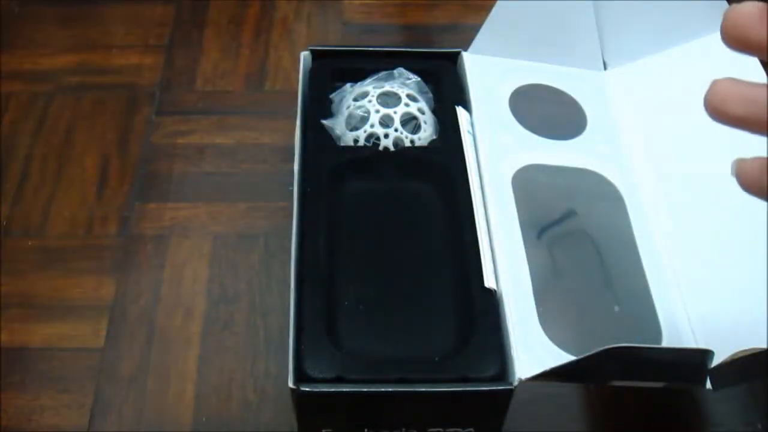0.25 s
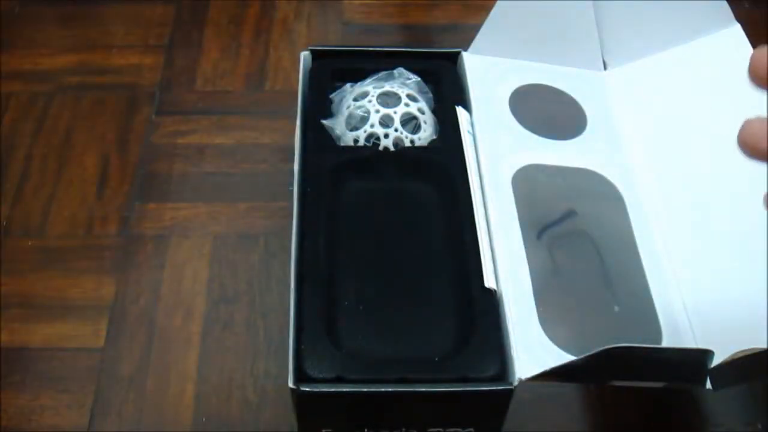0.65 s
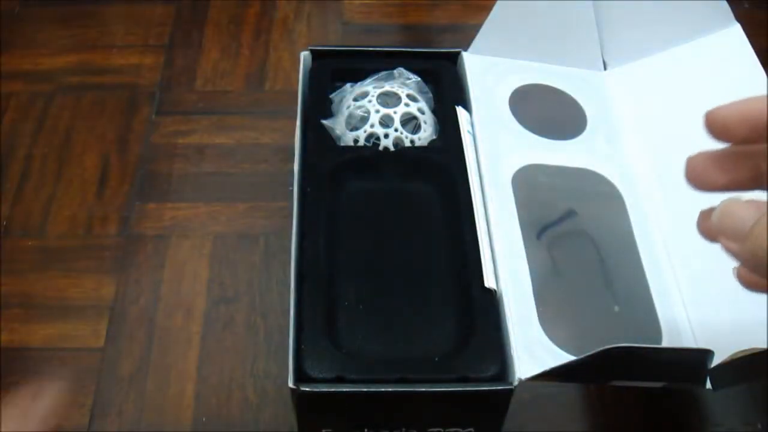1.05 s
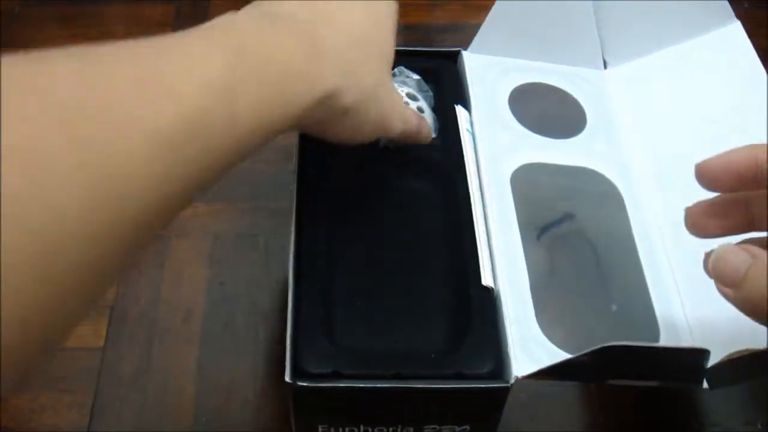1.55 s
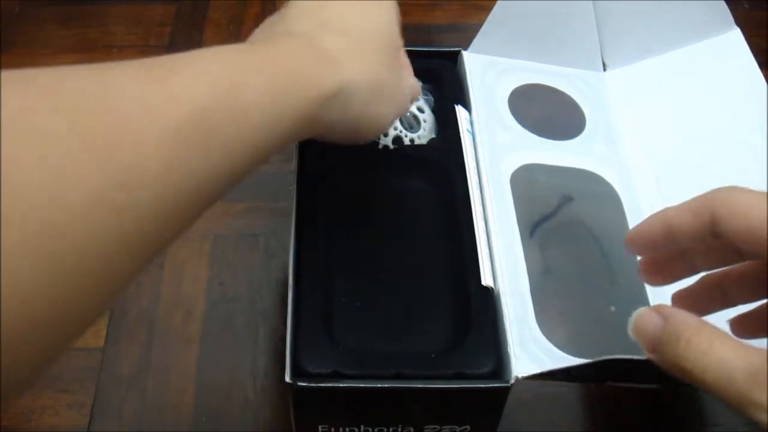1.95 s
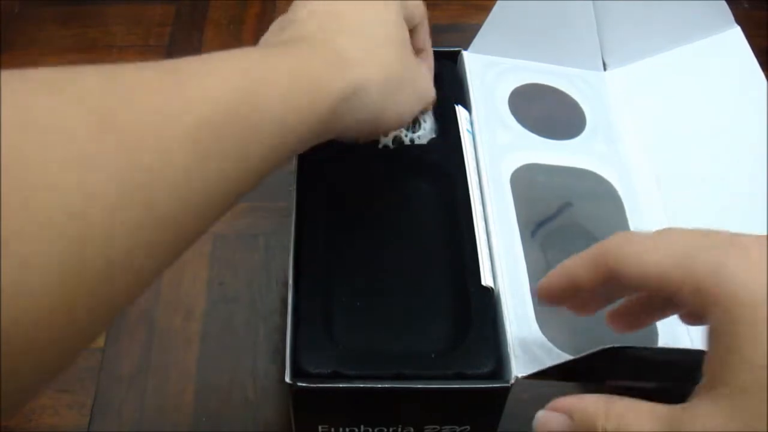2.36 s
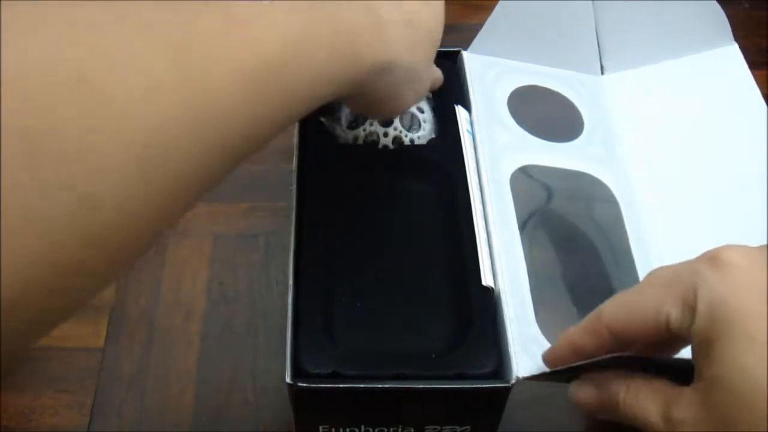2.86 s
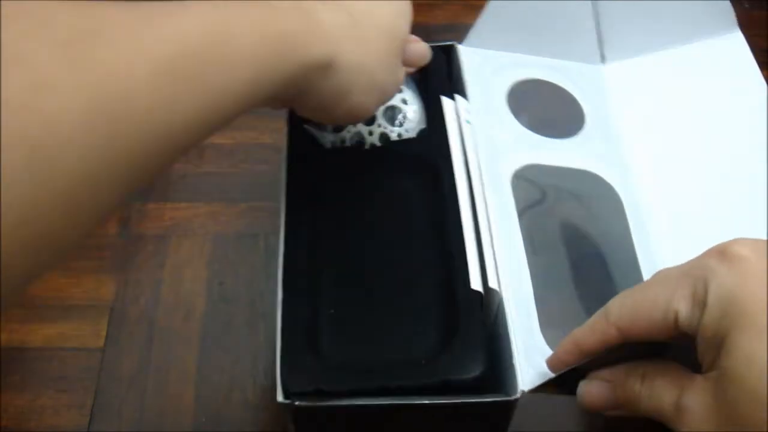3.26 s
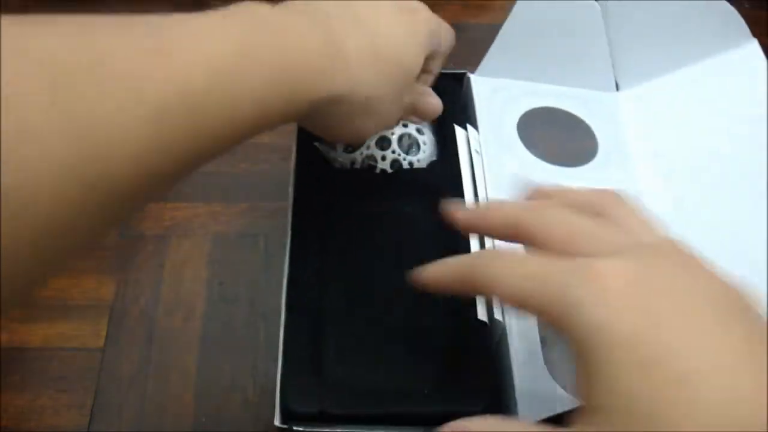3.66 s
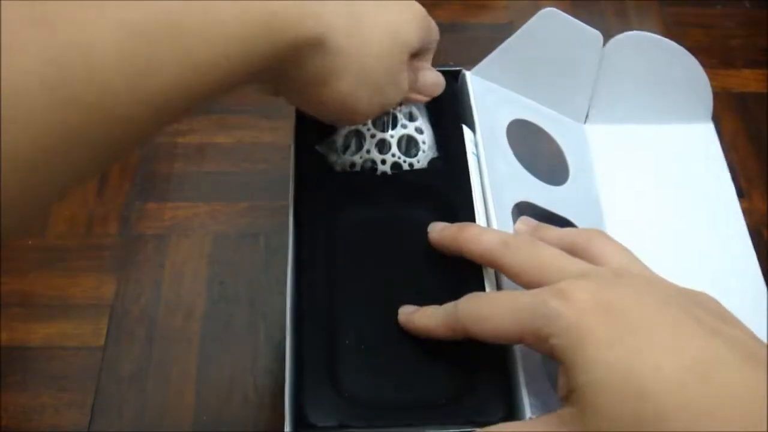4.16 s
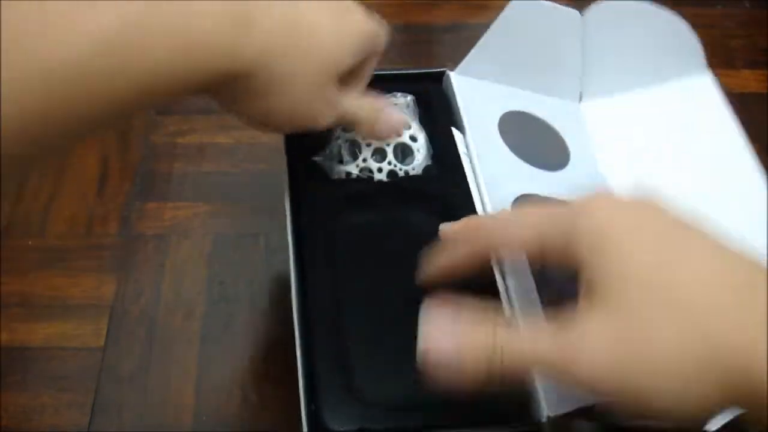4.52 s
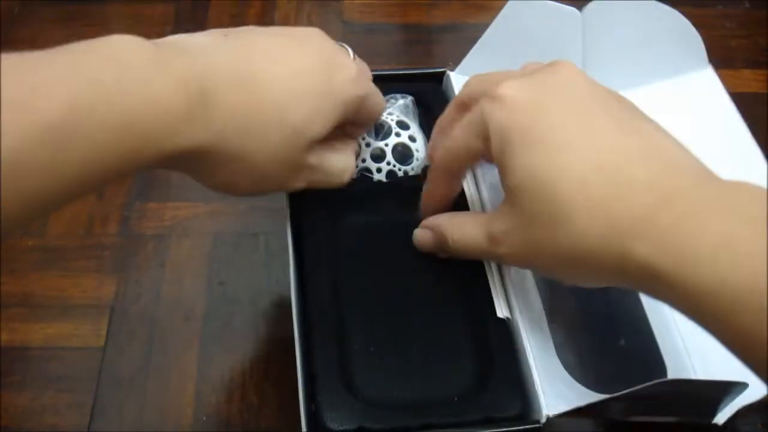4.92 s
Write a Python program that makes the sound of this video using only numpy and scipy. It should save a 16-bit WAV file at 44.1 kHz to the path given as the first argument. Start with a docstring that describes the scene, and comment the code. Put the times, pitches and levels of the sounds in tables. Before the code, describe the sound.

Short papery rubs and isolated plastic clicks come first, one of them sharp, then near silence. From about a second and a half, plastic wrapping crackles almost continuously in irregular tugs, bright and brittle, mixed with faint cardboard scraping and small hollow bumps. It thins briefly around four seconds, then grows denser and louder. Heard close on a small microphone in a small room with slight reflections and low noise.

```python
"""Fingers dig at a part wrapped in thin plastic film: sharp ringing snaps over tiny crinkles and sliding hiss.
Snaps are damped rings plus noise cracks; crinkles are random short rings; hiss and scraping are coloured grains.
Before that a hand brushes the open lid of the cardboard box; hand and part bump the box, a bank of damped modes.
A small room answers, over steady noise and hum; a small microphone with a narrow band listens from close by."""
import sys
import numpy as np
from scipy import signal
from scipy.fft import rfft, irfft, next_fast_len
from scipy.io import wavfile
from scipy.ndimage import uniform_filter1d, map_coordinates

SR = 44100
rng = np.random.default_rng(int(sys.argv[2]) if len(sys.argv) > 2 else 0)


def to_wav(s):
    """Save 16-bit WAV."""
    ch = np.atleast_2d(s).T  # columns
    pcm = np.round(np.clip(ch, -1, 1) * 32767)  # PCM
    wavfile.write(sys.argv[1], SR, pcm.astype(np.int16))


N = 228832  # length [samples]


def amp(db):
    """Decibels to gain."""
    return 10 ** (np.asarray(db) / 20)


def unit(x):
    """Scale to rms 1."""
    return x / np.sqrt(np.mean(x ** 2) + 1e-20)


def along(points, hz):
    """Interpolate (frequency [Hz], value) points on a log-frequency axis."""
    f, v = np.transpose(points)
    return np.interp(np.log(hz + 1), np.log(f), v)


def wobble(knots_per_s):
    """Smooth random curve through normally distributed knots."""
    knots = rng.standard_normal(int(N * knots_per_s / SR) + 4)
    return map_coordinates(knots, [np.arange(N) * knots_per_s / SR])


def coloured(x, spectrum, size=2048):
    """Minimum-phase filter with the given spectrum, keeping the power of white noise."""
    gain = amp(along(spectrum, np.fft.rfftfreq(size, 1 / SR)))
    cepstrum = irfft(np.log(gain))
    # fold the cepstrum to make the response causal
    cepstrum[1:size // 2] *= 2
    cepstrum[size // 2 + 1:] = 0
    response = unit(irfft(np.exp(rfft(cepstrum)))) / np.sqrt(size)
    return signal.fftconvolve(x, response)[:len(x)]


def add(track, start_s, sound):
    """Mix a sound into the track in place."""
    part = track[max(round(start_s * SR), 0):][:len(sound)]
    part += sound[:len(part)]


def ring(t, hz, t60_s):
    """Damped vibration that builds up over about its first cycle."""
    return np.sin(2 * np.pi * hz * t) * amp(-60 * t / t60_s) * (1 - np.exp(-2 * hz * t))


def levelled(x, span_s):
    """Even out the power over the span, leaving the finer grain."""
    power = np.abs(uniform_filter1d(x ** 2, int(span_s * SR)))
    return x / np.sqrt(power + 1e-3 * np.mean(x ** 2))


def strokes(rows, rise_db_per_s, fall_db_per_s):
    """Each stroke swells, holds and dies away; strokes add in power, one gain curve per level column."""
    t = np.arange(N) / SR
    power = 0
    for start_s, held_s, *levels_db in rows:
        before_s = np.maximum(start_s - t, 0)
        after_s = np.maximum(t - start_s - held_s, 0)
        shape_db = -rise_db_per_s * before_s - fall_db_per_s * after_s
        live = shape_db > -60
        shape = np.zeros(N)
        shape[live] = amp(shape_db[live])
        power = power + np.outer(amp(levels_db), shape) ** 2
    return np.sqrt(power)


def crinkles(per_s, hz, spread, cycles, size_db, count=260):
    """Tiny facets buckle at random, each with its own pitch; most are faint, a few stand out."""
    when, pitch, size_draw = rng.random((int(per_s * N / SR), 3)).T
    t = np.arange(count) / SR
    f = hz * np.exp(spread * (2 * pitch - 1))[:, None]
    # exponential spread of sizes in dB, capped
    sizes = amp(size_db * np.minimum(-np.log(1 - size_draw), 4))[:, None]
    grains = sizes * ring(t, f, cycles / f)
    at = (when * N).astype(int)[:, None] + np.arange(count)
    return unit(np.bincount(at.ravel(), grains.ravel(), N + count)[:N])


def rustle(colour, slips, per_s, hz, cycles, size_db, smooth):
    """Crinkles over a smooth rub, clumped by the slips of the fingers; rms near 1."""
    grains = crinkles(per_s, hz, spread=0.61, cycles=cycles, size_db=size_db)
    grains = grains + smooth * rng.standard_normal(N)
    return levelled(coloured(grains * slips, colour), span_s=0.0305)


# Spectrum of the steady noise: (frequency [Hz], relative density [dB])
NOISE_COLOUR = [(25, -26), (70, -11.5), (130, -5.5), (300, 2.5), (450, 1.5), (800, 2), (1200, -0.5),
                (1600, -1), (2300, -5.5), (5000, -10), (11000, -16)]


def background(noise_db, hum_db=-83, hum_hz=100):
    """Steady room noise with a faint mains hum."""
    noise = unit(coloured(rng.standard_normal(N), NOISE_COLOUR))
    hum = unit(np.sin(2 * np.pi * hum_hz * np.arange(N) / SR))
    return amp(noise_db) * noise + amp(hum_db) * hum


# Reverberation time of the room: (frequency [Hz], t60 [s])
ROOM_DECAY = [(200, 0.65), (2000, 0.29), (10000, 0.26)]


def room(x):
    """The walls' answer, a decaying noise tail; the treble dies first."""
    hz, t, z = signal.stft(rng.standard_normal(SR // 2), SR, nperseg=256)
    decay = amp(-60 * t / along(ROOM_DECAY, hz)[:, None])
    tail = signal.istft(z * decay, SR, nperseg=256)[1]
    tail = np.pad(tail, (SR // 300, 0))  # gap before the answer
    return signal.fftconvolve(x, tail / np.linalg.norm(tail))[:N]


# Brushes over the lid: (start of hold [s], hold [s], rustle level [dB], hiss level [dB])
LID_BRUSHES = [(0.262, 0.023, -38, -39), (0.44, 0.13, -45, -42), (0.677, .022, -34, -39),
               (0.865, 0.16, -52, -51), (1.008, 0.0087, -47.5, -38.5)]
# Spectra of lid rustle and hiss: (frequency [Hz], relative density [dB])
LID_RUSTLE_COLOUR = [(40, -43), (120, -29), (330, -7), (620, -5.5), (900, -4), (1300, -2.5), (1580, 0.5),
                     (1800, -1.5), (2100, 8.5), (2700, -6.5), (4000, 0), (11000, -33)]
LID_HISS_COLOUR = [(40, -51), (1000, -27), (2500, 2.5), (3500, -2.5), (4500, -1), (6300, 0), (8500, -3.5),
                   (11000, -6.5)]


def lid(clump_db=4.0):
    """Fingers slide over the lid and its plastic window in a few strokes; their slips clump rustle and hiss."""
    rustle_gain, hiss_gain = strokes(LID_BRUSHES, rise_db_per_s=472, fall_db_per_s=254)
    slips = amp(clump_db * wobble(300))
    rub = rustle(LID_RUSTLE_COLOUR, slips, per_s=1400, hz=1820, cycles=2.9, size_db=2.5, smooth=2.9)
    fizz = rustle(LID_HISS_COLOUR, slips, per_s=2300, hz=5950, cycles=3.1, size_db=4.5, smooth=0.95)
    return rustle_gain * rub + hiss_gain * fizz


# Bumps on the box: (time [s], relative panel level [dB], panel pitch [Hz], relative whole-box level [dB])
BOX_BUMPS = [(0.679, -15, 1574, -51), (1.425, -19, 752, -40.5), (1.573, -31.5, 720, -59),
             (1.828, -30.5, 685, -48.5), (1.921, -32, 860, -46), (2.387, -34, 650, -55),
             (2.759, -22, 543, -49), (3.487, -22.5, 430, -40.5), (3.689, -26, 740, -42.5),
             (3.866, -20.5, 895, -39), (4.349, -16.5, 970, -43.5), (4.857, -27, 984, -43.5),
             (4.918, -15.5, 825, -62), (4.953, -26, 770, -61), (5.053, -21, 1325, -66)]
# Low modes of the whole box: (frequency [Hz], relative level [dB], t60 [s])
BOX_MODES = [(176, -12.5, 0.1), (233, 0, 0.043), (310, -2.5, 0.12), (376, 3, 0.048), (462, -9, 0.088),
             (511, 0.5, 0.2), (528, -11, 0.043), (790, 2.5, 0.11)]


def bumps(panel_t60_s=0.019, panel_gain_db=-23.5, box_gain_db=-10, chatter=0.98, chatter_t60_s=0.058):
    """A blow and its dying chatter ring the struck panel and the low modes of the whole box."""
    t = np.arange(SR // 5) / SR
    track = np.zeros(N)
    box = np.zeros(len(t))
    for k, (f, mode_db, t60_s) in enumerate(BOX_MODES):
        box += (-1) ** k * amp(mode_db) * ring(t, f, t60_s)
    for time_s, panel_db, hz, box_db in BOX_BUMPS:
        noise = rng.standard_normal(len(t)) * amp(-60 * t / chatter_t60_s)
        force = chatter * unit(noise) / np.sqrt(len(t))
        force[0] += 1  # the blow
        panel = ring(t, hz, panel_t60_s) + 0.33 * ring(t, 0.72 * hz, panel_t60_s)
        for response, level_db in [(panel, panel_db + panel_gain_db), (box, box_db + box_gain_db)]:
            sound = unit(signal.fftconvolve(force, response)[:len(t)])
            add(track, time_s, amp(level_db) * sound)
    return track


GRIP_S = 1.425  # the fingers reach the part and stay on it
GRIP_FILM_DB, GRIP_HISS_DB, GRIP_SCRAPE_DB = -58, -63, -62.5  # faint rustle between tugs
# Tugs at the part: (start of hold [s], hold [s], film level [dB], hiss level [dB], cardboard scrape level [dB])
FILM_TUGS = [(1.432, .015, -35.5, -39, -46), (1.49, 0.06, -37, -48, -54.5), (1.648, 0.024, -45, -69, -54.5),
             (1.712, 0.1, -39.5, -44, -52.5), (1.885, 0.028, -41, -49, -50),
             (1.995, 0.033, -43.5, -51, -50.5), (2.175, 0.061, -42, -48, -55),
             (2.29, 0.14, -48, -49.5, -56.5), (2.54, 0.016, -44, -54, -78), (2.69, 0.079, -39.5, -48, -59),
             (2.76, 0.039, -40, -44, -45), (2.94, 0.045, -44.5, -56, -57), (3.09, 0.038, -38, -46, -56),
             (3.175, 0.058, -39, -46, -42.5), (3.26, 0.027, -47.5, -62, -50.5),
             (3.452, 0.042, -37, -50.5, -49), (3.50, 0.037, -37.5, -42, -40.5),
             (3.675, 0.039, -38.5, -43.5, -47), (3.82, 0.23, -42.5, -50.5, -47),
             (4.195, 0.021, -44.5, -59, -51.5), (4.36, 0.11, -42, -54, -60), (4.48, 0.055, -35, -40.5, -41),
             (4.615, 0.037, -44, -48.5, -44), (4.745, 0.0047, -35.5, -42, -50.5),
             (4.815, 0.035, -38, -47, -52), (4.925, 0.066, -37, -50, -44), (5.045, 0.0079, -35.5, -39, -63),
             (5.135, .06, -44.5, -50, -53.5)]


def effort():
    """Gains of film, hiss and scrape: tugs on top of a steady light grip."""
    grip = amp([[GRIP_FILM_DB], [GRIP_HISS_DB], [GRIP_SCRAPE_DB]])
    tugs = strokes(FILM_TUGS, rise_db_per_s=583, fall_db_per_s=283)
    gripping = np.arange(N) / SR >= GRIP_S
    return np.hypot(tugs, grip) * gripping


# Spectra of crinkling film, sliding hiss and scraped cardboard: (frequency [Hz], relative density [dB])
FILM_COLOUR = [(40, -38), (300, -16), (800, -16), (1200, -7.5), (1600, -3.5), (2000, 3.5), (2400, -2.5),
               (2900, 2), (3300, -2.5), (3900, 1), (4600, -21), (7000, -19), (11000, -28.5)]
HISS_COLOUR = [(40, -50), (800, 6), (2500, -11), (4800, 4), (6300, 2), (8500, 0.5), (11000, -0.5)]
CARDBOARD_COLOUR = [(30, -55), (70, -31), (120, -14.5), (200, 1), (350, 2.5), (520, 4), (660, 10),
                    (880, 12.5), (1150, 7), (1800, -19), (4000, -47)]


def handling(film_gain, hiss_gain, scrape_gain, clump_db=3.0):
    """Stick and slip of the fingers drives crinkling, sliding hiss and scraping of the box together."""
    slips = amp(clump_db * wobble(260))
    folds = rustle(FILM_COLOUR, slips, per_s=1200, hz=2390, cycles=13.6, size_db=3.0, smooth=0.34)
    fizz = rustle(HISS_COLOUR, slips, per_s=1500, hz=6600, cycles=2.2, size_db=6.5, smooth=1.0)
    rub = rustle(CARDBOARD_COLOUR, slips, per_s=700, hz=677, cycles=2.0, size_db=2.5, smooth=2.14)
    return film_gain * folds + hiss_gain * fizz + scrape_gain * rub


LESSER_PER_S, LESSER_OVER_DB, LESSER_FOLLOWS, LESSER_SCATTER_DB = 22, 6, 0.86, 3.5  # FOLLOWS: dB per film dB
LESSER_HZ, LESSER_CRACK_DB = 2490, -8
PITCH_SPREAD = 0.16  # log-frequency scale, lesser snaps and fore-ticks


def lesser_snaps(film_gain):
    """Snap rows for small creases that give way at random, louder under a harder tug."""
    count = int((N / SR - GRIP_S) * LESSER_PER_S)
    chance = rng.random((count, 4))
    times_s = GRIP_S + (np.arange(count) + chance[:, 0]) / LESSER_PER_S
    size, pitch, bright = np.sqrt(3) * (2 * chance[:, 1:].T - 1)  # uniform, variance 1
    film_db = 20 * np.log10(np.interp(times_s * SR, np.arange(N), film_gain) + 1e-6)
    body_db = LESSER_OVER_DB + LESSER_FOLLOWS * film_db + LESSER_SCATTER_DB * size
    crack_db = body_db + LESSER_CRACK_DB + LESSER_SCATTER_DB * bright
    return list(zip(times_s, body_db, LESSER_HZ * np.exp(PITCH_SPREAD * pitch), crack_db))


def fore_ticks(rows, ahead_s=.004, under_db=-15):
    """Snap rows for a faint tick a few ms ahead of each listed snap."""
    chance = rng.uniform(-1.1, 1, (len(rows), 2))
    ticks = []
    for (time_s, body_db, hz, crack_db), (early, pitch) in zip(rows, chance):
        tick_s = time_s - ahead_s * (1 + .5 * early)
        tick_hz = hz * np.exp(PITCH_SPREAD * pitch)
        ticks.append((tick_s, body_db + under_db, tick_hz, crack_db + under_db))
    return ticks


# Snaps that stand out, loud or isolated, first in the lid's window, then in the film:
# (time [s], relative body level [dB], pitch [Hz], relative crack level [dB])
LISTED_SNAPS = [(0.158, -37.5, 2900, -45.5), (0.208, -35, 1960, -38), (0.2428, -29, 3430, -23),
                (0.278, -24.5, 2900, -43), (0.2878, -23.5, 2170, -31), (0.4163, -37, 3600, -25.5),
                (0.4622, -41, 2290, -31.5), (0.48, -43, 2410, -24), (0.5913, -38, 2560, -32.5),
                (0.6733, -20, 3250, -20.5), (0.6791, -18.5, 1740, -18.5), (0.84, -35.5, 2070, -31),
                (0.883, -40, 3580, -25.5), (1.0208, -31, 3900, -27.5), (1.1714, -38, 3240, -41),
                (1.4269, -22, 1695, -32), (1.4416, -21.5, 2680, -38), (1.5316, -20.5, 2650, -25),
                (1.564, -21, 2240, -26.5), (1.6851, -22, 2180, -27.5), (1.712, -21.5, 2710, -31),
                (1.728, -21.5, 3830, -39), (1.7659, -13, 2400, -24.5), (1.8128, -25, 2140, -24),
                (1.83, -28, 2760, -25), (1.8662, -22, 2140, -28), (1.9233, -19.5, 2190, -26.5),
                (1.9946, -24.5, 2300, -32), (2.0039, -26, 3420, -32.5), (2.0267, -26, 3880, -28.5),
                (2.0746, -37, 2350, -38.5), (2.1646, -23.5, 2950, -30), (2.172, -24.5, 2700, -44),
                (2.19, -26, 3700, -33), (2.2951, -25, 2100, -30), (2.3155, -20.5, 2660, -29),
                (2.327, -21.5, 2160, -32), (2.3732, -27.5, 2620, -40), (2.4149, -18.5, 1970, -21.5),
                (2.561, -32, 2740, -35), (2.692, -26.5, 2420, -42), (2.76, -20, 2150, -27),
                (2.8223, -28, 3020, -27.5), (2.849, -23, 2970, -40), (2.8934, -23, 2780, -36.5),
                (2.939, -20, 2800, -28), (2.9624, -22, 2260, -28), (2.9703, -24, 2040, -31),
                (2.9968, -26, 2600, -29), (3.0353, -18.5, 3010, -32), (3.1061, -18, 3020, -30.5),
                (3.1204, -31, 2100, -38), (3.1393, -22.5, 2130, -29.5), (3.3262, -24.5, 2210, -52),
                (3.34, -24, 3140, -41), (3.3894, -26, 2230, -42), (3.5061, -16.5, 2740, -24.5),
                (3.5576, -15.5, 2780, -26), (3.5976, -12.5, 2130, -27.5), (3.7564, -24, 2860, -28.5),
                (3.769, -16, 3160, -28), (3.7956, -17.5, 2450, -30.5), (3.8387, -26, 2960, -28.5),
                (3.9046, -18.5, 2000, -30), (3.9207, -22.5, 2090, -48), (3.9673, -22.5, 2800, -38),
                (4.1157, -36, 2710, -33.5), (4.2266, -32, 2200, -31), (4.2673, -31, 2770, -42),
                (4.2847, -27.5, 2390, -34), (4.3953, -19.5, 2150, -25), (4.4202, -22.5, 3020, -26),
                (4.444, -20.5, 3020, -30), (4.4639, -27.5, 2400, -30), (4.4827, -17, 2470, -38),
                (4.5087, -28, 2410, -23), (4.5127, -15.5, 1960, -30), (4.533, -21, 2840, -24.5),
                (4.546, -18.5, 1680, -29), (4.7519, -21, 2310, -30), (4.8078, -23.5, 2380, -38),
                (4.8421, -19.5, 1800, -25.5), (4.9205, -16.5, 1650, -38), (4.9966, -15.5, 3230, -26.5),
                (5.0534, -18.5, 2030, -33), (5.0569, -15.5, 2530, -19), (5.0604, -13, 2150, -27),
                (5.1784, -16, 2420, -19.5)]
# Spectrum of the crack: (frequency [Hz], relative density [dB])
CRACK_COLOUR = [(30, -40), (100, -22), (250, -28), (750, 1.5), (1200, -6.5), (2000, 5.5), (4000, 6),
                (4700, 1.5), (6500, 3), (9000, 0.5), (11000, -3.5)]


def snaps(rows, ring_t60_s=0.0073, overtone_db=-10, crack_t60_s=0.0046, shiver_db=-11, shiver_t60_s=0.026,
          body_gain_db=1, crack_gain_db=-14):
    """A crease flips: a bright crack shivers through the film, and the facet swings for a few cycles."""
    t = np.arange(SR // 40) / SR
    body, cracks = np.zeros(N), np.zeros(N)
    for time_s, body_db, hz, crack_db in rows:
        life, low, high = np.exp(rng.normal(0, [.2, .1, .1]))
        swing = ring(t, hz, ring_t60_s * life)
        overtones = ring(t, 1950 * low, ring_t60_s) + ring(t, 3600 * high, ring_t60_s)
        swing += amp(overtone_db) * overtones
        add(body, time_s - .0002, amp(body_db + body_gain_db) * swing / np.abs(swing).max())
        fade = amp(-60 * t / crack_t60_s) + amp(shiver_db - 60 * t / (shiver_t60_s * life))
        crack = unit(fade * rng.standard_normal(len(t)))
        add(cracks, time_s, amp(crack_db + crack_gain_db) * crack)
    return body + coloured(cracks, CRACK_COLOUR)


def scene():
    """Film, lid and box in the room."""
    film_gain, hiss_gain, scrape_gain = effort()
    all_snaps = LISTED_SNAPS + fore_ticks(LISTED_SNAPS) + lesser_snaps(film_gain)
    near = handling(film_gain, hiss_gain, scrape_gain) + lid() + bumps() + snaps(all_snaps)
    return (near + amp(-13.0) * room(near) + background(noise_db=-57.5))[None]


def record(dry, low_cut_hz=70, top_hz=11050):
    """The small microphone loses the deep bass and cuts off steeply above its band limit."""
    lean = signal.sosfilt(signal.butter(1, low_cut_hz, "high", fs=SR, output="sos"), dry)
    size = next_fast_len(N + SR // 4)
    hz = np.fft.rfftfreq(size, 1 / SR)
    band_gain = 1 / np.sqrt(1 + (hz / top_hz) ** 150)
    return irfft(rfft(lean, size) * band_gain, size)[..., :N]


dry = scene()
out = record(dry)
to_wav(out)
```